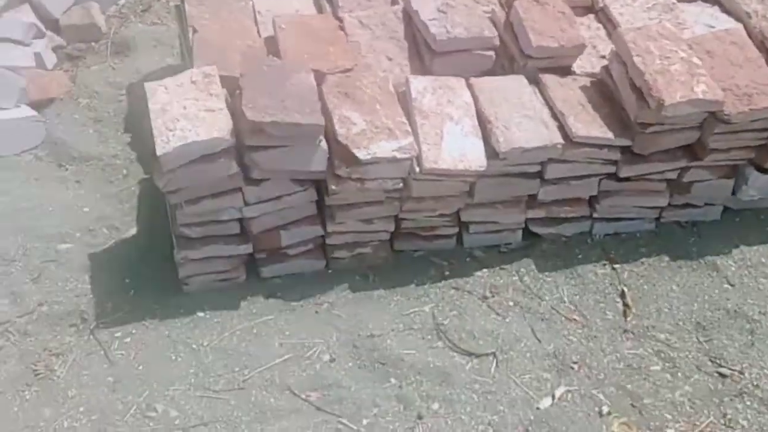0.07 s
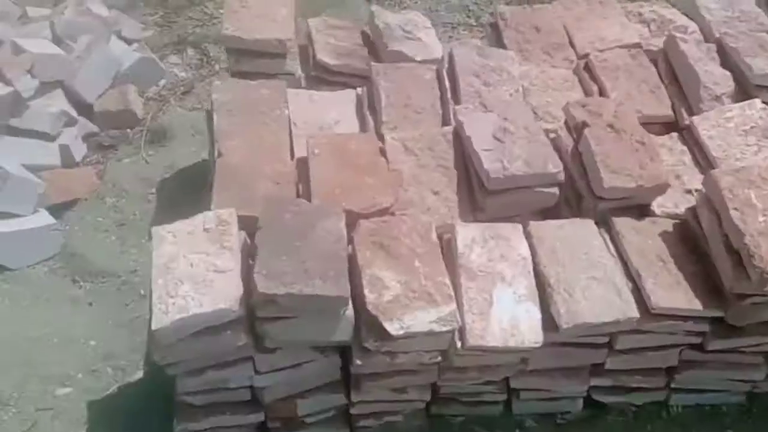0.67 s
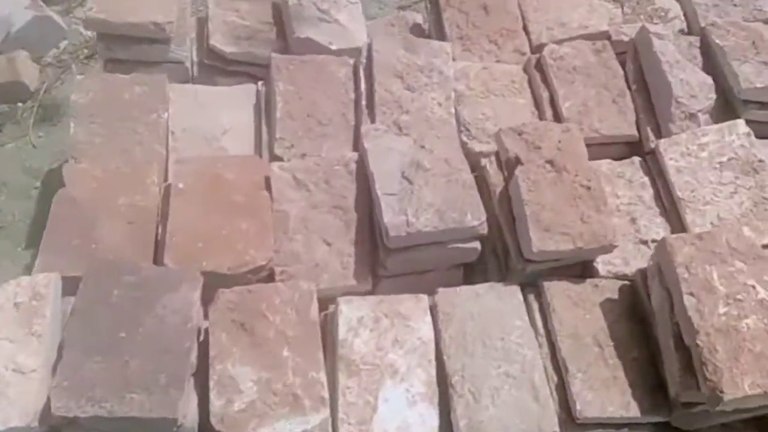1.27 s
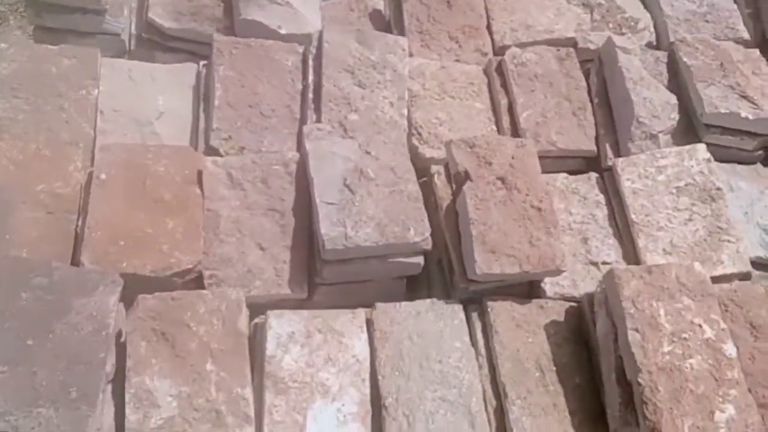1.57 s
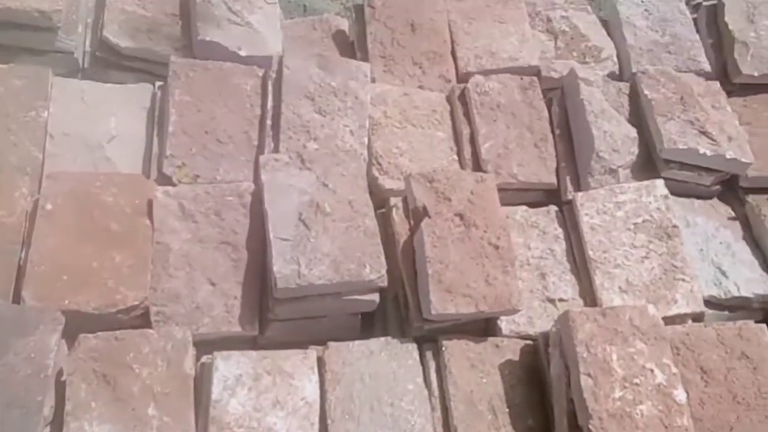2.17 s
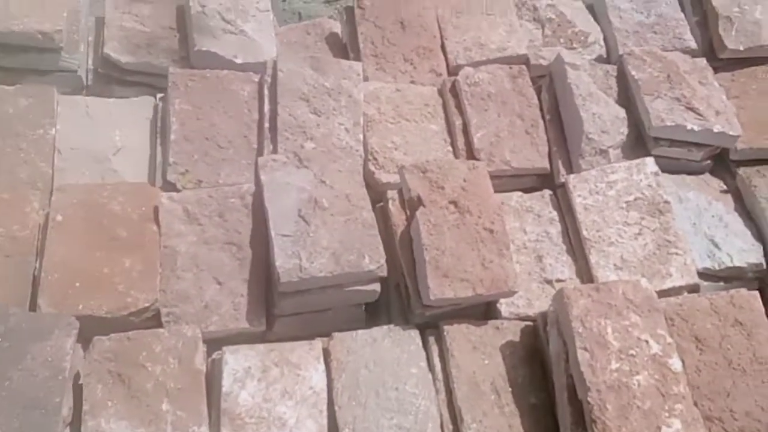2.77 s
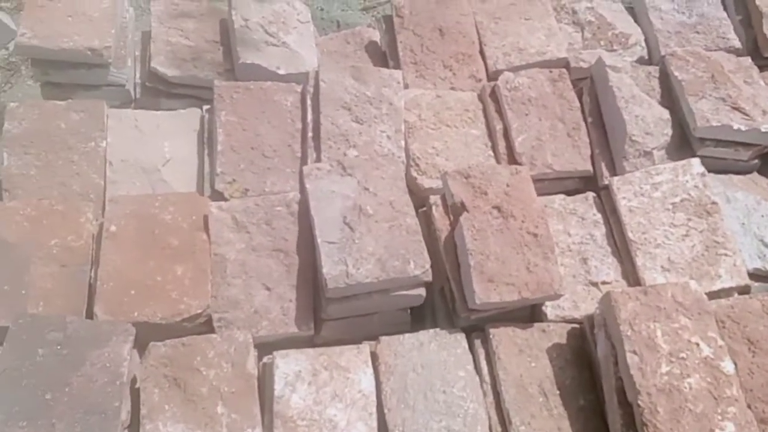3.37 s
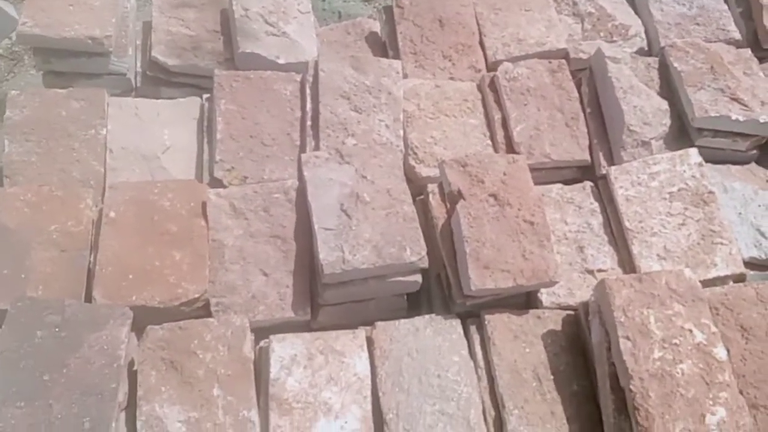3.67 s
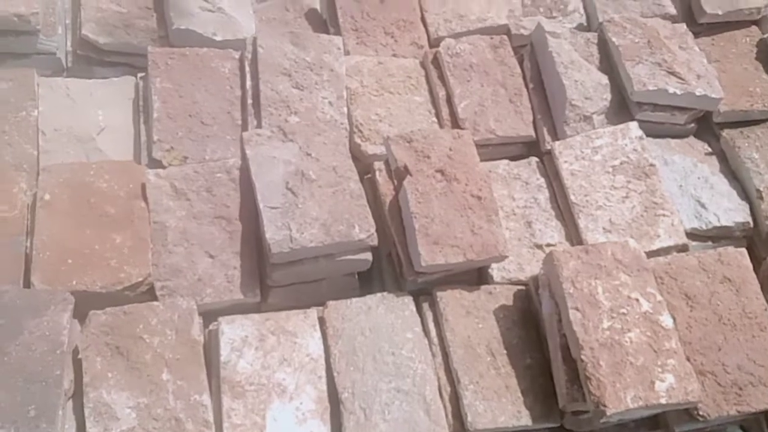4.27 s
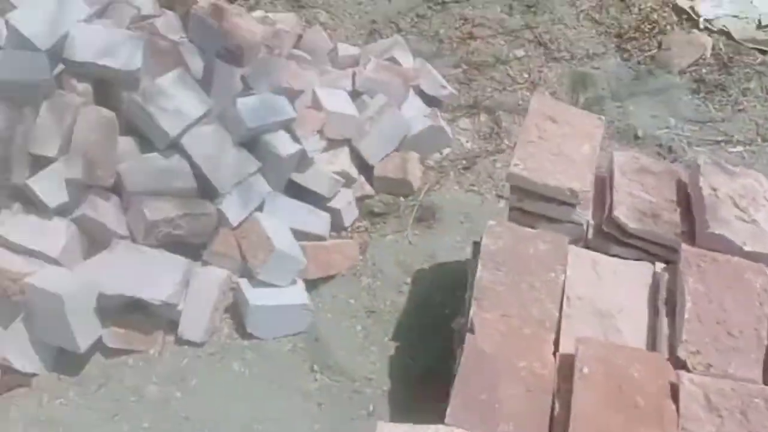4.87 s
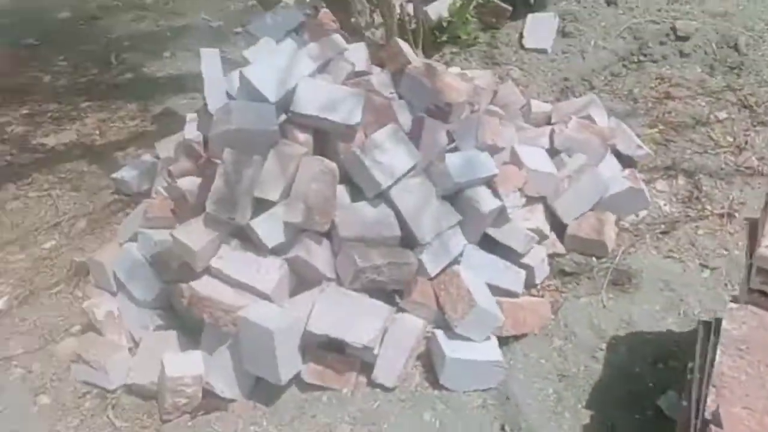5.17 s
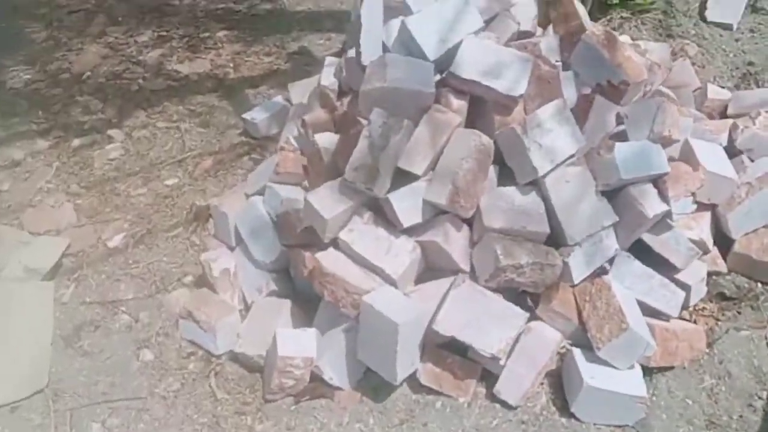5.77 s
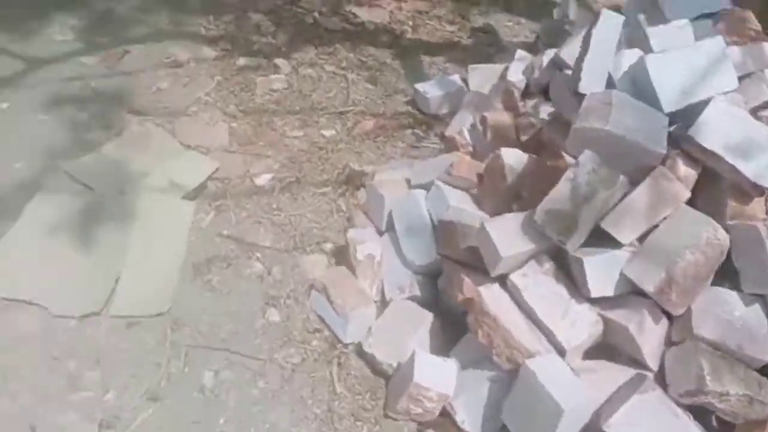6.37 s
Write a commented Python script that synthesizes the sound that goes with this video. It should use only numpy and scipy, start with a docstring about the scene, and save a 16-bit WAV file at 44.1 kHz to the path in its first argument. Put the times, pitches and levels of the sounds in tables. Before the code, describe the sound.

A slow diesel engine drones and ticks in the open while its saw blade skims stone, then grinds in harshly.

```python
"""Diesel stone saw in a yard

A stone saw belted to a slow diesel engine runs some way off in the open. The toothed blade whines and
skims the stone while the engine chugs and knocks once a cycle. At 3.4 s the blade bites: the whine
gives way to a gritty roar and the load drags the engine down."""
import sys
import numpy as np
from scipy import signal
from scipy.fft import rfft, irfft
from scipy.io import wavfile
from scipy.ndimage import uniform_filter1d, map_coordinates

SR = 44100
rng = np.random.default_rng(int(sys.argv[2]) if len(sys.argv) > 2 else 0)


def wrap_up_sound(samples):
    """Save the sound to the file named by the first command line argument, as 16-bit audio."""
    columns = np.atleast_2d(samples).T
    # keep every value between -1 and 1, then stretch to whole-number steps
    tamed = np.clip(columns, -1, 1)
    steps = np.round(tamed * 32767).astype(np.int16)
    wavfile.write(sys.argv[1], SR, steps)


N = 291501
TIME = np.arange(N) / SR
FREQ = np.maximum(np.arange(N // 2 + 1) * SR / N, 1)
TOOTH_COUNT = 36


# EQ of the blade skimming (dull, bright), biting, deep in the cut and labouring: f/Hz, gain/dB
DULL_SKIM_EQ = [(1600, -3), (1900, -10.5), (2250, 5), (2700, 7.5), (3350, -3), (3900, -10), (4300, -12),
                (4850, -9), (5300, -9), (5750, -4), (6100, -9), (6550, -8), (7000, -17), (7500, -17),
                (8500, -16), (9800, -17), (11000, -22), (12400, -38), (15500, -51)]
BRIGHT_SKIM_EQ = [(1600, -4.5), (1900, -5), (2250, 6.5), (2700, 8), (3200, -0.5), (3800, -3.5),
                  (4300, -8.5), (4950, -16), (5400, -12.5), (6000, -14), (6700, -7), (7300, -6.5),
                  (7900, -17), (8500, -16.5), (9800, -25), (10500, -26), (12400, -30), (13500, -34),
                  (15500, -34.5)]
BITE_EQ = [(940, -41), (1600, -5.5), (1810, -12.5), (2320, -3.5), (2430, -9), (2600, -2), (3290, -1.5),
           (4950, -13.5), (6780, -4), (7450, -2), (8300, -14.5), (9190, -19), (11900, -29.5), (14900, -29),
           (15500, -47)]
DEEP_EQ = [(940, -42), (1600, -8), (1920, -6.5), (2170, 2), (2450, -1.5), (2600, -5), (2700, -2.5),
           (2860, -6), (3290, 0.5), (5350, -14), (7450, -6), (10500, -29), (15500, -29)]
LABOUR_EQ = [(940, -53.5), (1600, -32), (1920, -16), (2070, -0.5), (2250, -10), (2410, -9), (2750, -2.5),
             (3620, 0.5), (5250, -13), (7450, -2.5), (10800, -28.5), (12300, -31), (15500, -31)]
# the skimming sounds duller at first, brighter from about 1.5 s: t/s, mix/0-1
BRIGHTENING = [(0, 0.1), (.85, 0.1), (1.6, 0.93), (6.61, 0.9)]
# faders of the three grinding bands: t/s, rasp/dB, hiss/dB, fine spray/dB
GRIND_FADERS = [(0.06, -51, -67, -81), (0.16, -52, -65, -78), (0.45, -46.5, -63, -84),
                (0.72, -50, -62.5, -87), (0.9, -50.5, -63, -85), (1.5, -49.5, -58.5, -72.5),
                (1.73, -55, -63.5, -80), (2.21, -51, -60.5, -78), (2.6, -51, -59.5, -83),
                (2.75, -53, -62, -83), (3.35, -51.5, -61, -81), (3.53, -45.5, -53, -78),
                (3.85, -47.5, -53.5, -79), (4, -49, -54.5, -80), (4.4, -49.5, -54, -79),
                (4.92, -51, -57.5, -81), (5.17, -52, -57, -82), (6.11, -52, -57, -79), (6.2, -50, -56, -75),
                (6.45, -51.5, -56.5, -72)]
# those bands and their trims: low/Hz, high/Hz, skimming/dB, biting/dB, deep/dB
GRIND_SPLIT = [(1740, 4550, -2.5, -3.5, -3), (4860, 10900, -2.5, -1.5, -0.5), (11900, 17000, 3.5, 3, 2)]

def grinding(turns, progress, skim_fresh=0.88, cut_fresh=0.75, chatter_db=0.92):
    """The rim drags the same grit past on each turn while new grains break away; the blade colours it."""
    rim = blend(repeating(turns, size=1200), repeating(turns, size=1200), .5 + 0.24 * walk(3.95))
    fresh = skim_fresh + np.minimum(progress, 1) * (cut_fresh - skim_fresh)
    new_grit = unit(noise() * undb(walk(1400)))
    rub = blend(rim, new_grit, fresh)
    combed = tooth_comb(rub, turns)
    bright, = curves(BRIGHTENING)
    skim = (1 - bright) * colour(combed, DULL_SKIM_EQ) + bright * colour(combed, BRIGHT_SKIM_EQ)
    stages = skim, colour(rub, BITE_EQ), colour(rub, DEEP_EQ), colour(rub, LABOUR_EQ)
    roar = sum(stage * np.maximum(1 - abs(progress - k), 0) for k, stage in enumerate(stages))
    out = 0
    for (low_hz, high_hz, *trims_db), db in zip(GRIND_SPLIT, curves(GRIND_FADERS)):
        part = band(roar, low_hz, high_hz, order=20)
        levelled = part / np.sqrt(uniform_filter1d(part ** 2, size=8000))
        out += levelled * undb(db + np.interp(progress, [0, 1, 2], trims_db))
    return out * undb(chatter_db * walk(90))


def tooth_comb(rub, turns, repeat=.3, above_hz=6200):
    """Tooth after tooth skims the same grains, gathering the hiss round the overtones of the whine."""
    one_tooth_ago = np.interp(turns - 1 / TOOTH_COUNT, turns, np.arange(N))
    hiss = echo = band(rub, above_hz, SR)
    body = rub - hiss
    for _ in range(5):
        echo = repeat * map_coordinates(echo, [one_tooth_ago], order=3)
        hiss = hiss + echo
    return body + hiss * np.sqrt(1 - repeat ** 2)


# fader of the whine's fundamental: t/s, level/dB
WHINE_FADER = [(0.0, -66), (0.22, -61.5), (1.5, -60), (1.8, -66), (2.47, -61), (2.74, -66.5), (3.12, -56.5),
               (3.86, -66), (4.12, -59), (4.3, -56), (4.5, -58.5), (4.74, -70), (5.1, -65.5), (5.8, -75),
               (6.0, -69), (6.3, -89), (6.58, -69)]
# brushing overtones, a row per harmonic from the 2nd up: dull skim/dB, bright skim/dB
BRUSH_HARMONICS = [(-6.5, -6), (-19.5, -13), (-11, -15), (-25, -13), (-27, -15), (-27.5, -24.5), (-27, -39),
                   (-40, -46)]

def whine(turns, progress, tone_db=-0.6, brush_db=-3.5, smother_db=-8, spacing_rad=.125, flutter_rad=.06):
    """Teeth beat the air and brush the stone; the bite smothers the brushing overtones."""
    angle = 2 * np.pi * turns * TOOTH_COUNT
    bright, = curves(BRIGHTENING)
    uneven = spacing_rad * repeating(turns, size=14) + flutter_rad * walk(420)
    brush = 0
    for k, (dull_db, bright_db) in enumerate(BRUSH_HARMONICS, 2):
        db = dull_db + bright * (bright_db - dull_db) + 2.5 * walk(30.08)
        clean = np.cos(k * (angle + uneven))
        # chipped teeth scatter each overtone into sidebands, the higher ones most
        chipped = sum(blend(repeating(turns, size=7), walk(260), .5) * wave(k * angle)
                      for wave in (np.cos, np.sin)) / np.sqrt(2)
        brush += undb(db) * blend(clean, chipped, share=min(.02 + .13 * (k - 2), .75))
    rasp_db = curves(GRIND_FADERS)[0]
    brush *= undb(rasp_db + brush_db + smother_db * np.minimum(progress, 1))
    tone = np.cos(angle) * undb(curves(WHINE_FADER)[0] + tone_db + walk(10))
    return np.sqrt(2) * (tone + brush)


# ringing modes, riding the rasp fader: f/Hz, skimming/dB, biting/dB, deep/dB
RING_MODES = [(2247, -10.5, -22, -12), (2388, -31, -14.5, -19.5), (2595, -37, -20, -24),
              (2715, -28, -16, -17), (2778, -15.5, -20, -20), (2950, -37, -15.5, -17),
              (2900, -34, -16, -17), (3164, -49, -16, -28), (3325, -42, -24, -15), (3430, -38, -16, -30),
              (3544, -20, -15, -20), (3634, -18.5, -16.5, -28), (3710, -32, -23, -16),
              (3760, -25, -19, -37), (3945, -24, -19, -24), (4040, -23, -20, -21), (4230, -36, -22, -28)]

def blade_ring(turns, progress, width_hz=17, flicker_db=3, trim_db=-1, choke_db=-7):
    """The rim drives the blade's modes; each flickers as the stone catches it, until the cut chokes it."""
    drive = rfft(blend(repeating(turns, size=1200), noise(), share=0.45))
    out = 0
    for hz, *stage_db in RING_MODES:
        ring = unit(irfft(drive * resonance(hz, width_hz) ** 2, N))
        flicker = undb(flicker_db * walk(14))
        out += unit(ring * flicker) * undb(np.interp(progress, [0, 1, 2], stage_db))
    rasp_db = curves(GRIND_FADERS)[0]
    return out * undb(rasp_db + trim_db + choke_db * np.clip(progress - 2, 0, 1))


# squeal cues: centre t/s, length/s, f/Hz, level/dB
SQUEAL_CUES = [(0.39, .2, 2628, -53), (2.7, .25, 3660, -63.5), (3.6, .24, 3174, -52.5),
               (3.74, .3, 3464, -55), (3.8, .16, 3360, -61), (3.82, .2, 2596, -52.5),
               (3.86, .18, 2920, -57.5), (3.87, .14, 2778, -59), (4.28, .26, 3192, -54.5),
               (4.55, .2, 2778, -56.5), (4.62, .12, 3526, -61), (4.71, .16, 2560, -59),
               (4.99, .12, 3240, -62), (5.02, .15, 2925, -60), (5.24, .26, 2530, -61),
               (5.42, .17, 2375, -61), (5.59, .2, 2195, -60.5), (5.75, .2, 3715, -61)]

def squeals(jitter_rad=.55, tremble_db=1.5):
    """The stone feeds one mode of the blade, which swells to an unsteady squeal and dies away."""
    out, jitter = 0, jitter_rad * walk(60)
    for s, length_s, hz, db in SQUEAL_CUES:
        swell = np.exp(-2 * ((TIME - s) / length_s) ** 2)
        out += undb(db) * swell * np.sin(2 * np.pi * hz * TIME + jitter)
    return np.sqrt(2) * out * undb(tremble_db * (walk(45) - 0.5))


# two falling sweeps: t/s, centre f/Hz, level/dB
RASP_SWEEPS = [(4.3, 3700, -80), (4.6, 3560, -61), (4.88, 3330, -59), (5, 2950, -58), (5.12, 2620, -58.5),
               (5.3, 2500, -60), (5.45, 2290, -60), (5.68, 2170, -64), (5.95, 2073, -85), (6.08, 3930, -85),
               (6.2, 3800, -62), (6.38, 3500, -63), (6.55, 3200, -61), (6.61, 3170, -60)]

def sliding_rasp(width_hz=360, trim_db=-3):
    """A narrow band of the rasp glides down in pitch twice, like a shifting ground reflection."""
    hz, db = curves(RASP_SWEEPS)
    angle = 2 * np.pi * np.cumsum(hz) / SR
    return (walk(width_hz) * np.cos(angle) + walk(width_hz) * np.sin(angle)) * undb(db + trim_db)


# fader of the flying grit: t/s, level/dB
GRIT_FADER = [(0, -88), (1.2, -88), (1.55, -78), (1.95, -81), (2.15, -71), (2.5, -70), (2.68, -76),
              (2.85, -71), (3.0, -78), (3.17, -74), (3.4, -84), (4.2, -86), (4.5, -70), (4.8, -78),
              (6.61, -78)]

def flying_grit(grains_per_s=750, spread_db=2, decay_s=.0004):
    """Fine grit flies off the rim: a spatter of tiny, bright ticks."""
    grains = (rng.random(N) < grains_per_s / SR) * undb(spread_db * np.clip(noise(), -2, 2))
    ticks = signal.lfilter([1], [1, -np.exp(-1 / (decay_s * SR))], grains) * noise()
    sizzle = colour(ticks, [(3000, -27), (7000, 0), (11000, -11), (14500, 1)])
    return sizzle * undb(curves(GRIT_FADER)[0])


def belt_drive(engine_hz, load, ratio=2.1745, slip=.0145, wander=0.000798):
    """Blade turns per second: it follows the engine through a belt that slips under load."""
    return engine_hz * ratio * (1 - slip * load) * (1 + wander * walk(6))


# engine faders: t/s, exhaust/dB, frame/dB
ENGINE_FADERS = [(0.0, -64.5, -70.5), (0.4, -61, -66), (1.52, -60.5, -65.5), (1.68, -62, -69.5),
                 (2.1, -55.5, -63.5), (3.44, -56, -62), (3.91, -58.5, -64.5), (4.65, -58, -66.5),
                 (6.23, -57.5, -62.5), (6.5, -60.5, -65.5)]

def diesel(hz, load, drone_trim_db=-1, rattle_trim_db=2.5):
    """The engine drones through its exhaust, shakes its frame and knocks."""
    cycles = np.cumsum(hz) / SR
    drone_db, rattle_db = curves(ENGINE_FADERS)
    drone = exhaust(cycles, load) * undb(drone_db + drone_trim_db)
    rattle = frame(cycles, load) * undb(rattle_db + rattle_trim_db)
    return drone + rattle + clatter(cycles, hz, load) + pings() + thuds()


# drone, a row per harmonic of the cycle rate from the 4th up: running free/dB, loaded/dB
DRONE_HARMONICS = [(-26, -30), (-11, -10), (-9.5, -11), (-1.5, 1), (-0.5, -0.5), (2.5, -2), (-8, -2),
                   (-2, -4.5), (-22, -7), (-11.5, -16), (-22, -19), (-23, -5), (-7.5, -23), (-6.5, -2),
                   (-6.5, -15), (-14.5, -15), (-9, -5.5), (-16.5, -13), (-34, -17), (-53, -19)]
# gas puffs that set the drone's phases: place/cycles, relative strength, pipe f/Hz
GAS_PUFFS = [(0.041, 0.29, 87), (0.181, 0.65, 145), (0.517, 0.92, 140), (0.802, 0.51, 121.3),
             (0.87, 0.43, 289)]

def exhaust(cycles, load, pipe_q=4):
    """The puffs of each cycle ring the pipes and merge into a throbbing stack of low tones."""
    place, strength, pipe_hz = np.transpose(GAS_PUFFS)
    mean_hz = cycles[-1] / TIME[-1]
    out = 0
    for k, (free_db, loaded_db) in enumerate(DRONE_HARMONICS, 4):
        ratio = k * mean_hz / pipe_hz
        pipes = strength * np.exp(-2j * np.pi * k * place) / (1 + 1j * pipe_q * (ratio - 1 / ratio))
        db = free_db + load * (loaded_db - free_db) + walk(7.9)
        out += undb(db) * np.cos(2 * np.pi * k * cycles + np.angle(pipes.sum()))
    return unit(out)


# EQ of the rattle, running free and loaded: f/Hz, gain/dB
FREE_EQ = [(220, -42), (370, -11.5), (470, -3), (600, -9.5), (720, -9), (830, 0), (1150, -2.5), (1420, 1),
           (1650, -12), (1900, -10.5), (2500, -40), (4200, -90)]
LOADED_EQ = [(220, -22), (380, -10.5), (429, -1), (558, -27.5), (836, -1), (1040, -0.5), (1150, -9),
             (1230, -6), (1330, -6.5), (1460, -0.5), (1900, -13), (2470, -9), (4180, -120)]
# humming panels: harmonic of the cycle rate, level/dB
PANEL_HUM = [(26, -17), (31, -14), (33, -17), (35, -12), (40, -17), (41, -19), (42, -18), (49, -12)]

def frame(cycles, load, loose=0.6, throb=0.22):
    """The frame rattles partly alike each cycle, hardest after firing; running free, its panels hum."""
    free, loaded = (colour(blend(repeating(cycles, size=2048), noise(), loose), eq)
                    for eq in (FREE_EQ, LOADED_EQ))
    hum = sum(undb(db) * np.cos(2 * np.pi * (k * cycles + rng.random())) for k, db in PANEL_HUM)
    pulse = 1 + throb * np.cos(2 * np.pi * (cycles - .72))
    return blend(free + hum, loaded, load ** 2) * pulse


# combustion and valve hits: place running free/cycles, place loaded/cycles, rise/s, decay/s
CYCLE_HITS = [(0.568, 0.583, 0.00085, 0.003), (0.732, 0.786, 0.00072, 0.004)]
# their faders: t/s, combustion/dB, valve/dB, brightness/dB
CLATTER_FADERS = [(0, -52, -54, -22), (1.1, -56, -50, -17), (1.7, -57.5, -51, -4.5), (3.2, -49, -49, -13),
                  (4.199, -46, -48, -18), (5.3, -48.5, -56, -6), (6.1, -50.5, -54, 0.5),
                  (6.61, -47, -58, 0.5)]
# hard knock cues: t/s, level/dB, brightness/dB, ping f/Hz, ping level/dB
KNOCK_CUES = [(0.044, -54, -4, 2650, -43), (.108, -54, -6, 2600, -50), (.214, -37.5, -14, 2690, -42),
              (.283, -52, -12, 2640, -50), (.344, -47, -9, 2640, -44), (0.365, -50, -12, 2600, -40),
              (.452, -48, -14, 2700, -42), (.513, -49, -17, 2200, -44), (.642, -50, -18, 2510, -42),
              (0.818, -53, -20, 2620, -44), (0.871, -39, -17, 3650, -49), (.93, -47, -18, 2260, -46),
              (1.062, -50, -12, 5700, -49), (1.11, -44, -13, 2260, -49), (1.169, -54, -9, 5840, -51),
              (1.527, -46, 3, 2260, -46), (1.656, -56, 0, 2630, -45), (1.766, -50, 5, 2220, -48),
              (1.827, -50, 3, 3770, -47), (1.957, -54, -10, 2620, -42), (2.125, -47, -9, 2250, -42),
              (2.184, -40, -7, 3820, -42), (2.612, -36, -16, 2380, -39.5), (2.732, -49, -9, 2200, -47),
              (2.843, -53, 3, 2830, -42), (3.079, -47, -19, 2200, -41), (3.139, -48, -10, 2700, -47),
              (3.208, -54, -7, 2650, -44), (4.886, -49, 1, 3300, -52), (5.131, -48, 1, 3200, -54),
              (5.192, -48, -4, 3100, -50), (5.253, -42, -11, 2580, -51), (5.436, -50, 1, 3420, -52),
              (5.501, -48, 0, 3650, -48), (5.56, -52, -1, 3650, -48), (5.684, -61, -10, 3600, -45),
              (5.807, -59, 8, 3820, -41.5), (5.992, -46.5, -6, 3760, -48), (6.116, -53, -3, 4090, -45),
              (6.178, -47, 2, 3640, -43), (6.239, -46, 4, 3680, -40), (6.243, -51, 4, 3900, -46),
              (6.302, -54, 0, 3550, -47), (6.424, -50, -7, 3350, -42), (6.486, -46, 4.5, 3800, -48),
              (6.548, -50.5, 11, 3140, -39)]

def clatter(cycles, hz, load, scatter_db=0.85, hard_trim_db=-5.5):
    """A combustion knock and a valve clack strike the block each cycle, with stray hard knocks on top."""
    *levels_db, crack_db = curves(CLATTER_FADERS)
    force = 0
    for (free, loaded, rise_s, decay_s), db in zip(CYCLE_HITS, levels_db):
        place = free + load * (loaded - free)
        count = cycles - place + .5
        age = (count % 1 - .5) / hz
        accent_db = scatter_db * noise()[count.astype(int)]
        force += burst(age, rise_s, decay_s) * undb(db + accent_db)
    crack_gain = force * undb(crack_db)
    for s, db, bright_db, _, _ in KNOCK_CUES:
        knock = burst(TIME - s, rise_s=.0009, decay_s=.0032) * undb(db + hard_trim_db)
        force += knock
        crack_gain += knock * undb(bright_db)
    crack = colour(noise(), [(2500, -30), (5000, -5.5), (7600, 10.5), (9500, -8), (15000, -17.5)])
    return engine_block(noise() * force) + crack * crack_gain


# body resonances of the block: f/Hz, width/Hz, gain/dB
BLOCK_MODES = [(1534, 130, -8.5), (1945, 280, -6), (2230, 180, 3), (2390, 140, -8), (2580, 62, 4.5),
               (2820, 160, 1), (3610, 130, 3)]

def engine_block(blows):
    """Blows set the engine block and its covers ringing for a few milliseconds."""
    response = sum(undb(db) * resonance(hz, width) for hz, width, db in BLOCK_MODES)
    ring = lambda push: band(irfft(rfft(push) * response, N), 940, 3400, order=4)
    return ring(blows) / np.std(ring(noise()))


def pings(rise_s=0.00065, decay_s=0.005, jitter_rad=0.5):
    """Each hard knock sets a loose steel part ringing briefly."""
    out, jitter = 0, jitter_rad * walk(500)
    for s, _, _, hz, db in KNOCK_CUES:
        age = TIME - s
        out += undb(db) * burst(age, rise_s, decay_s) * np.sin(2 * np.pi * hz * age + jitter)
    return out


def thuds(pitch_hz=105, decay_s=0.012, lead_s=0.0027, trim_db=-18):
    """Each hard knock also jolts the engine on its bed."""
    out = 0
    for s, db, *_ in KNOCK_CUES:
        age = np.clip(TIME - s + lead_s, 0, .1)
        out -= undb(db + trim_db) * np.sin(2 * np.pi * pitch_hz * age) * np.exp(-age / decay_s)
    return band(out, 99, 600, order=10)


# EQ of the outdoor bed: f/Hz, gain/dB
YARD_EQ = [(20, -23), (55, -17), (90, -4), (140, -6.5), (280, 2.5), (450, -12), (900, -22), (15000, -38)]

def yard(level_db=-69, swell_db=3):
    """A low outdoor rumble swells and sinks."""
    return colour(noise(), YARD_EQ) * undb(level_db + swell_db * walk(3.92))


def undb(db):
    """Decibels to gain."""
    return 10 ** (np.asarray(db) / 20)


def unit(x):
    """Scale to rms 1."""
    return x / np.std(x)


def curves(table):
    """The columns of a timed table, one value per sample."""
    s, *columns = np.transpose(table)
    return [np.interp(TIME, s, c) for c in columns]


def noise():
    """White noise."""
    return rng.standard_normal(N)


def repeating(turns, size):
    """A loop of size random points that comes round on every turn."""
    loop = rng.standard_normal(size)
    return unit(map_coordinates(loop, [turns % 1 * size], order=3, mode="grid-wrap"))


def walk(rate, size=16384):
    """Smooth random drift of spread 1, with a new value rate times a second."""
    return repeating(TIME * rate / size, size)


def colour(x, eq):
    """Filter by an EQ curve (f/Hz, gain/dB) and scale to rms 1."""
    hz, db = np.transpose(eq)
    return unit(irfft(rfft(x) * undb(np.interp(np.log(FREQ), np.log(hz), db)), N))


def band(x, low_hz, high_hz, order=12):
    """Band-pass filter."""
    return irfft(rfft(x) / np.sqrt((1 + (low_hz / FREQ) ** order) * (1 + (FREQ / high_hz) ** order)), N)


def resonance(hz, width_hz):
    """Frequency response of one mode."""
    return 1 / (1 + 1j * (FREQ ** 2 - hz ** 2) / (FREQ * width_hz))


def blend(a, b, share):
    """Equal-power crossfade from a to b."""
    share = np.clip(share, 0, 1)
    return np.sqrt(1 - share) * a + np.sqrt(share) * b


def burst(age, rise_s, decay_s):
    """Envelope of a blow: quick swell, then decay."""
    return np.exp(np.minimum(age / rise_s, -age / decay_s))


# engine tempo: t/s, cycle rate/Hz
ENGINE_SPEED = [(0, 16.78), (0.9, 16.73), (1.5, 16.76), (2.5, 16.75), (3.5, 16.77), (4, 16.59),
                (4.7, 16.45), (5.5, 16.23), (6.61, 16.18)]
# strain on the engine: t/s, load/0-1
ENGINE_LOAD = [(0, 0.05), (3.6, 0), (5.1, 0.92), (6.61, 1)]
# morph of the cut: t/s, stage (0 skimming, 1 biting, 2 deep, 3 labouring)
CUT_PROGRESS = [(0, 0), (3.38, 0), (3.44, 1), (4.4, 1), (5.1, 2), (5.6, 2), (6, 3)]

def scene():
    """Saw and engine over the rumble of the yard, the same in both channels."""
    engine_hz, = curves(ENGINE_SPEED)
    load, = curves(ENGINE_LOAD)
    progress, = curves(CUT_PROGRESS)
    turns = np.cumsum(belt_drive(engine_hz, load)) / SR
    engine = diesel(engine_hz, load)
    steel = whine(turns, progress) + blade_ring(turns, progress) + squeals()
    stone = grinding(turns, progress) + sliding_rasp() + flying_grit()
    return np.tile(steel + stone + engine + yard(), (2, 1))


def record(dry, top_hz=15520):
    """A steep low-pass takes off the highest treble."""
    return signal.sosfilt(signal.ellip(12, .2, 70, top_hz, fs=SR, output="sos"), dry)


dry = scene()
out = record(dry)
wrap_up_sound(out)
```